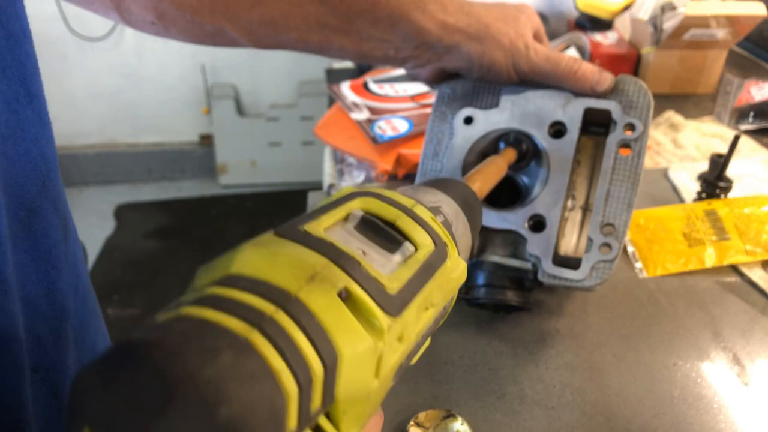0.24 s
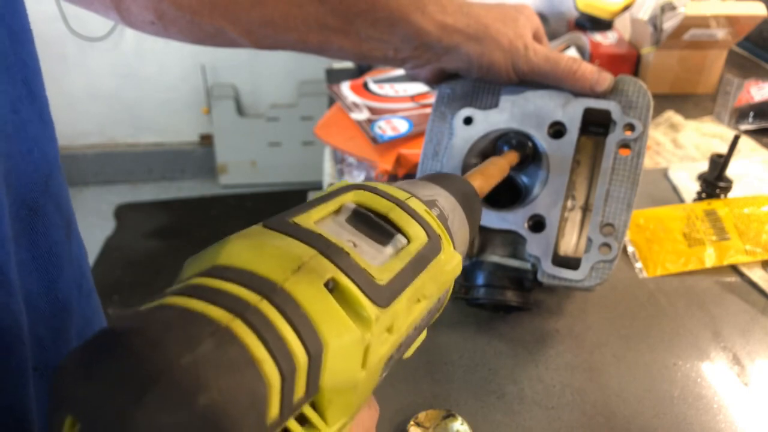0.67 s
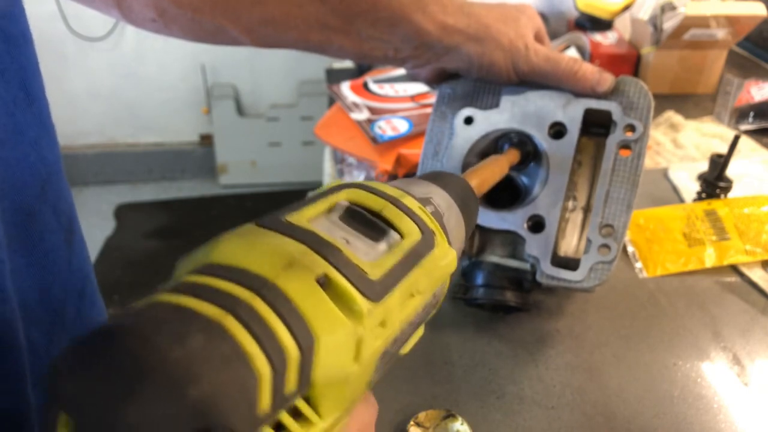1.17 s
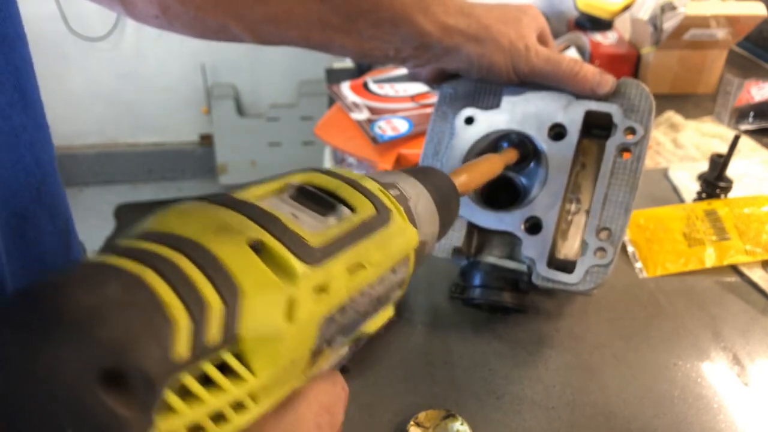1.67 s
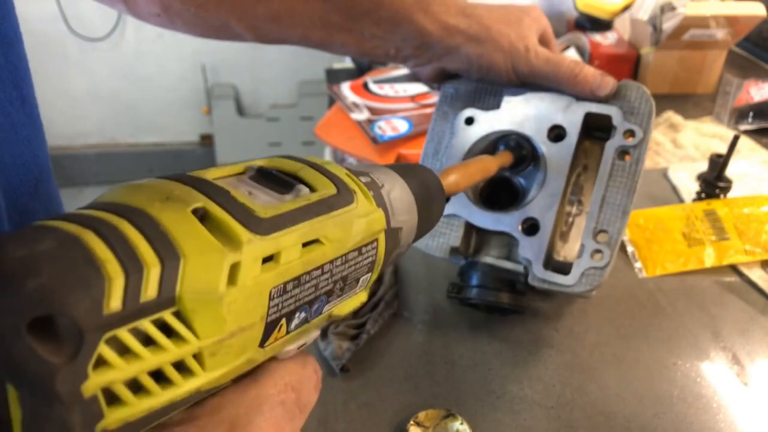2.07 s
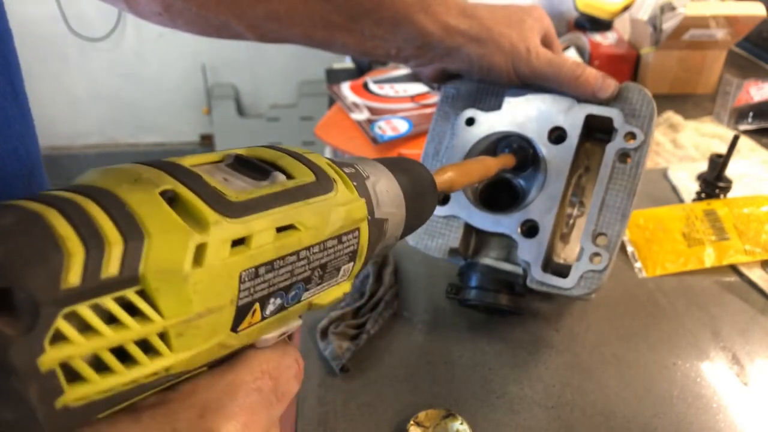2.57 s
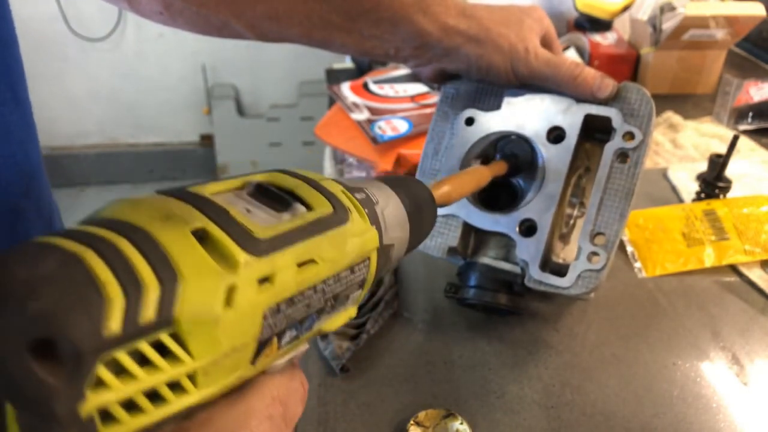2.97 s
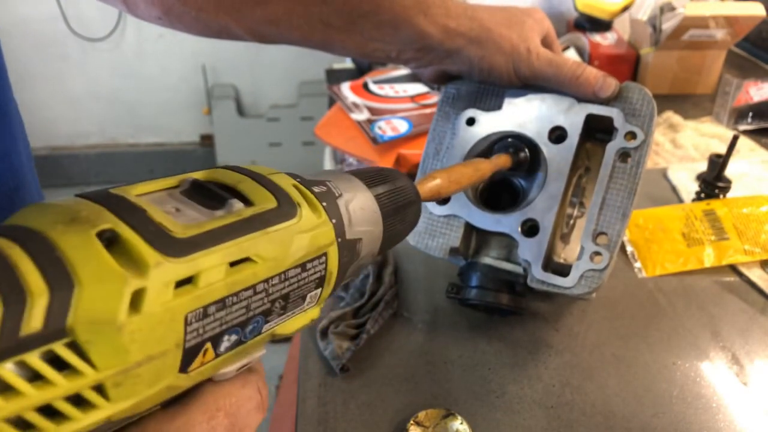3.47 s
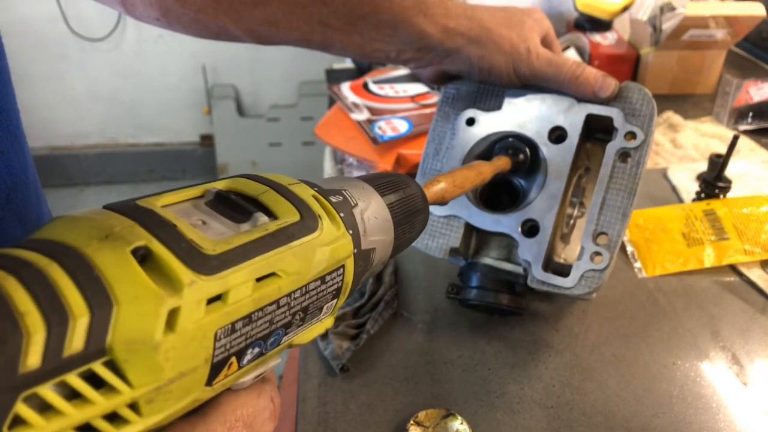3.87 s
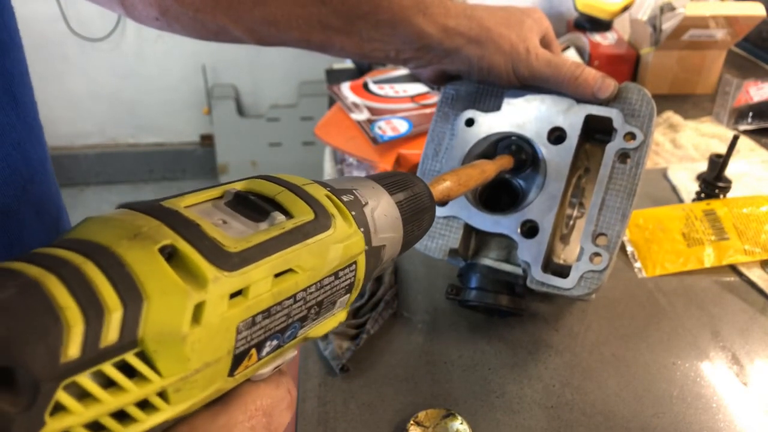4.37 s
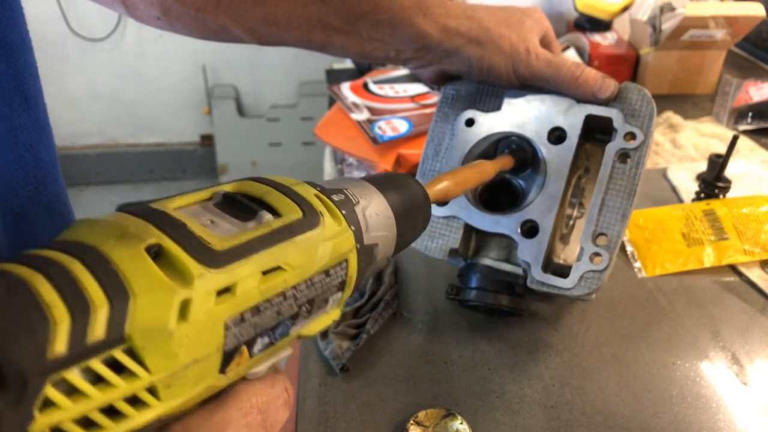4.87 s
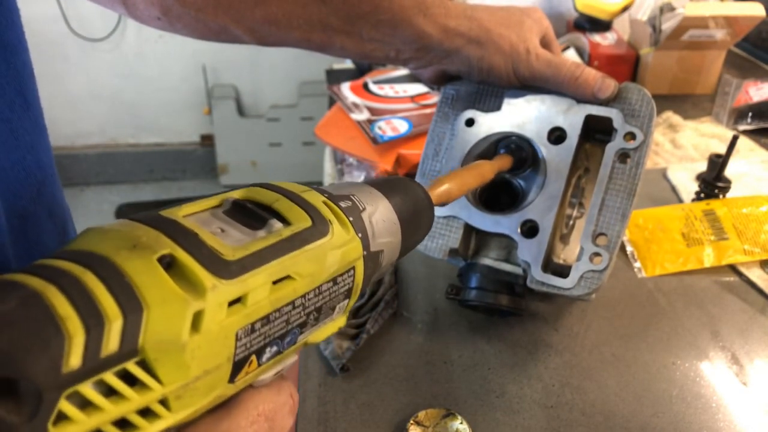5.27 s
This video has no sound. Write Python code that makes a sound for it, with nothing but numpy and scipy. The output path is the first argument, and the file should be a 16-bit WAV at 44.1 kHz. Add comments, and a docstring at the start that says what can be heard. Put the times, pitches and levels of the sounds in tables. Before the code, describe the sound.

A cordless drill is already running close to the microphone in a small workshop, its rattly gear whirr carrying a thin, very high electronic whine and, briefly, a low drone. A light touch and knock at 0.1 s lead to gritty grinding pushes at about 0.25-0.7, 0.97-1.3, 1.55-1.85, 2.15-2.5 and 2.7-3.0 s, each biting hard then mostly easing, rough and crunchy with mid-pitched metal ringing. Dull thuds mark several landings, brief bright fizzes come near 0.97 and 1.56 s, and caught grains tick. A weak last rub fades as the motor winds down around 3.2-3.3 s. Faint, falling, fuzzy squeaks follow to 3.9 s, then soft low bumps and one faint squeak around 4-4.5 s over a quiet murmur of air. At 4.6 s the drill restarts slower and quieter, the valve chattering and singing on a wavering, fluttering mid tone with small clicks, until the end near 5.6 s.

```python
"""A cordless drill spins an engine valve on its seat in gritty lapping paste, close by in a small workshop.
Random impacts of gears and brushes excite the housing as a whirr; the speed controller whines with motor sidebands.
Each push crushes clumps of grit, which ring the valve and cylinder head, with knocks, scrapes and catching grains.
The drill stops with a few faint squeaks (sliding resonant noise) and soft bumps of the hands, then runs again
more slowly, the valve chattering on one wavering mode. A short room tail and a murmur of air surround it."""
import sys
import numpy as np
from scipy import signal
from scipy.fft import rfft, irfft
from scipy.io import wavfile
from scipy.ndimage import uniform_filter1d, map_coordinates

SR = 44100
rng = np.random.default_rng(int(sys.argv[2]) if len(sys.argv) > 2 else 0)


def master_out(mix):
    """Clip the mix to full scale and print it as 16-bit PCM to the path in sys.argv[1]."""
    frames = np.transpose(np.atleast_2d(mix))
    ceiling = np.clip(frames, -1, 1)
    pcm = np.round(ceiling * 32767).astype(np.int16)
    wavfile.write(sys.argv[1], SR, pcm)


N = 243873
T = np.arange(N) / SR  # time axis [s]
HZ = np.fft.rfftfreq(8192, 1 / SR)  # frequency axis of the body responses [Hz]

# broad colour of crushed grit: (frequency [Hz], gain [dB])
GRIT_COLOUR = [(30, -50), (65, -15.5), (180, -22.5), (330, -9), (700, -8.5), (1000, -4.5), (1200, -2),
               (1450, 0), (1650, -11.5), (2000, -11.5), (3000, -20), (4000, -23.5), (7000, -35.5),
               (15000, -36)]
# resonances and dips of the valve and cylinder head: (frequency [Hz], width [Hz], lift [dB])
HEAD_MODES = [(407, 62, 6.5), (480, 40, -3.5), (538, 37, 4.5), (571, 30, -4.5), (640, 43, 4.5),
              (740, 60, -7), (1040, 31, -11), (1131, 43, 6.5), (1262, 70, 5.5), (1440, 60, 4),
              (1544, 50, -5.5), (1750, 150, -2.5), (1850, 71, 2), (1990, 28, 5), (2056, 26, 4),
              (2520, 75, 4.5), (3597, 60, 6), (3870, 64, 15), (3900, 240, 6), (4470, 49, 3), (5090, 55, 16)]


def amp(db):
    """Level law: decibels to amplitude gain."""
    return 10 ** (np.asarray(db) / 20)


def evened(x):
    """Power normalisation: scales to rms 1."""
    return x / np.sqrt(np.mean(x ** 2) + 1e-20)


def band(x, lo_hz, hi_hz):
    """Ideal band-pass: keeps the spectrum between two frequencies."""
    hz = np.fft.rfftfreq(len(x), 1 / SR)
    return irfft(rfft(x) * (hz >= lo_hz) * (hz <= hi_hz), len(x))


def wander(rate_hz):
    """Random modulation: noise from 0.5 Hz up to a rate, of rms 1."""
    return evened(band(rng.standard_normal(N), .5, rate_hz))


def curve(rows, column=1):
    """Linear interpolation: follows one column of a table through time."""
    rows = np.asarray(rows)
    return np.interp(T, rows[:, 0], rows[:, column])


def since(s):
    """Elapsed time: seconds gone by since a moment, zero before it."""
    return np.maximum(T - s, 0)


def envelope(start, end, attack_s, release_s):
    """Amplitude envelope: a straight attack, a hold and an exponential release."""
    attack = np.minimum(since(start) / attack_s, 1)
    return attack * np.exp(-since(end) / release_s)


def body(colour, resonances=()):
    """Minimum-phase response: a broad colour with resonances on it becomes a causal impulse response."""
    hz, db = np.transpose(colour)
    gain_db = np.interp(np.log(HZ + 1), np.log(hz + 1), db)
    for centre, width, lift in resonances:
        gain_db = gain_db + lift / (1 + (2 * (HZ - centre) / width) ** 2)
    log_gain = np.log(amp(np.r_[gain_db, gain_db[-2:0:-1]]))
    # the Hilbert transform of the log gain gives the phase
    spectrum = np.exp(np.conj(signal.hilbert(log_gain)))
    return np.fft.ifft(spectrum).real[:len(HZ)]


def ring(x, response):
    """Linear vibration: convolves an excitation with an impulse response."""
    return signal.oaconvolve(x, response)[:N]


def resonate(x, hz, width):
    """Damped resonance of peak gain 1, at a fixed or moving frequency."""
    turn = np.exp(2j * np.pi * np.cumsum(hz * np.ones(len(x))) / SR)
    r = np.exp(-np.pi * width / SR)
    # shift down to 0 Hz, smooth, and shift back up
    return 2 * (turn * signal.lfilter([1 - r], [1, -r], x / turn)).real


def grains(per_s, spread_db):
    """Random impulse process: tiny impacts, a few much larger than the rest, of rms 1."""
    size = amp(spread_db * np.minimum(rng.exponential(1, N), 4))
    sign = rng.choice([-1, 1], N)
    return evened(size * sign * (rng.random(N) < per_s / SR))


def add(mix, s, sound):
    """Superposition: adds a sound at a time."""
    part = mix[max(round(s * SR), 0):][:len(sound)]
    part += sound[:len(part)]


def speed(run):
    """Motor inertia: speed nears its full value exponentially after the trigger and falls evenly on release."""
    start_lag_s, spin_up_s, coast_s = .027, .02, .088
    pulled, released = run[:2]
    spin_up = 1 - np.exp(-since(pulled + start_lag_s) / spin_up_s)
    return spin_up * np.maximum(1 - since(released) / coast_s, 0)


def pressure():
    """Contact force: how hard the valve is pressed on its seat, as a gain of the grinding."""
    # each push bites, eases off and lets go:
    # (start [s], length [s], attack [s], grinding before trim [dB], easing [dB])
    push_rows = [(.08, .06, .04, -50, 0), (.256, .43, .022, -38.8, 2.8), (.966, .31, .014, -37, 5),
                 (1.545, .31, .025, -36.2, 8.5), (2.146, .38, .014, -36, 6.8), (2.692, .29, .025, -39, 4.8),
                 (3, .245, .06, -47.5, 0)]
    total = 0
    for s, length, attack, db, easing_db in push_rows:
        eased_db = db - easing_db * np.minimum(since(s) / length, 1)
        total = total + envelope(s, s + length, attack, release_s=.028) * amp(eased_db)
    return total


def gears(run, housing, motor_hz, throb):
    """Impact excitation: teeth and brushes rattle the housing, harder once a motor turn; load adds level."""
    settle_s, load_db = .45, 1.1
    pulled, _, db, start_db = run
    turns = np.cumsum(motor_hz * (1 + .02 * wander(6))) / SR
    rattle = grains(16000, 1.76) * (1 + throb * np.cos(2 * np.pi * turns)) * amp(0.84 * wander(40))
    whirr = ring(rattle, housing)
    load = pressure()
    extra_db = start_db * np.exp(-since(pulled) / settle_s) + load_db * load / load.max()
    loudness = speed(run) * amp(db + extra_db)
    return loudness * whirr / np.std(band(whirr, 1550, 16000))


def bench_echo(x, delay_s=0.001096, echo_db=-12):
    """Comb interference: the bench reflects the treble over a path that shifts as the hand sways."""
    sway = uniform_filter1d(wander(1.5), 2001)
    delay = delay_s * (1 + 0.061 * sway)
    treble = band(x, 4900, SR / 2)
    return x + amp(echo_db) * map_coordinates(treble, [(T - delay) * SR], order=3)


def whine(run, levels, motor_hz, side_db, octave_side_db, tone_db, octave_db):
    """Amplitude modulation: the turning motor puts sidebands on the switching tone and its octave."""
    switch_hz, fade_s = 7388, .012
    idle_rise_hz, current_rise_s = 650, .022  # it starts high, until the current has built up
    inrush_dip_hz, inrush_s = 400, .06  # it dips as the motor draws its starting current
    pulled, released = run[:2]
    hz = switch_hz + idle_rise_hz * np.exp(-since(pulled) / current_rise_s)
    hz = hz - inrush_dip_hz * np.exp(-since(pulled) / inrush_s)
    phase = 2 * np.pi * np.cumsum(hz + 4 * wander(60) + 6 * wander(4)) / SR
    motor = np.cos(2 * np.pi * np.cumsum(motor_hz * (1 + .015 * wander(3))) / SR)
    tone = amp(tone_db + curve(levels)) * np.sin(phase) * (1 + 2 * amp(side_db) * motor)
    octave = amp(octave_db + curve(levels, 2)) * np.sin(2 * phase)
    octave = octave * (1 + 2 * amp(octave_side_db) * motor)
    switched_on = envelope(pulled, released - 2 * fade_s, fade_s, fade_s)
    return np.sqrt(2) * switched_on * amp(0.48 * wander(50)) * (tone + octave)


def drone():
    """Resonant build-up: the gears' rattle excites a low mode of the housing, then fades early on."""
    # the droning mode: (hold until [s], frequency [Hz], width [Hz], level [dB])
    until, hz, width_hz, db = (.28, 345, 60, -48.5)
    hum = resonate(resonate(grains(16000, 1.76), hz, width_hz), hz, 3 * width_hz)
    return amp(db) * envelope(0, until, .005, .08) * evened(hum)


def workshop(x, t60=0.24, wet_db=-16):
    """Reverberant decay: a short, dull tail from nearby walls, over a murmur of air."""
    # colour of the room's air: (frequency [Hz], gain [dB])
    air_colour = [(18, -51), (30, -60), (59, -5), (129, -9), (205, -7), (384, -7), (567, -13.5), (928, -17),
                  (1270, -19.5), (1520, -23), (2990, -25.5), (3410, -21), (4090, -21.5), (15000, -39)]
    t = np.arange(SR // 2) / SR
    dull_noise = signal.lfilter([1], [1, -.6], rng.standard_normal(len(t)))
    tail = dull_noise * amp(-60 * t / t60) * (t > .005)
    air = evened(ring(rng.standard_normal(N), body(air_colour))) * amp(-66)
    air = air + .1 * wander(9.3) * band(air, 0, 1500)  # the low murmur is restless, the hiss even
    return x + amp(wet_db) * ring(x, tail / np.linalg.norm(tail)) + air


def disperse(x, spread_s):
    """Dispersion: bending waves cross the casting at different speeds and smear each click."""
    hz = np.fft.rfftfreq(N, 1 / SR)
    knots_hz = np.arange(0, SR, 400)
    delay = np.interp(hz, knots_hz, spread_s * rng.random(len(knots_hz)))
    # phase is the running sum of delay over frequency
    return irfft(rfft(x) * np.exp(-2j * np.pi * np.cumsum(delay) * SR / N), N)


def grinding():
    """Abrasive excitation: grit crushed in rapid clumps under each push rings the valve and the head."""
    trim_db = -2.07
    clumps = evened(band(rng.standard_normal(N), 70, 260))
    crush = grains(9000, 1.7) * amp(2.6 * np.clip(clumps, -2, 2))
    sound = ring(disperse(crush, spread_s=0.002022), body(GRIT_COLOUR, HEAD_MODES))
    return amp(trim_db) * pressure() * sound / np.std(band(sound, 1210, 1660))


def knocks(lag_s=0.02, bend_hz=190):
    """Dispersive impact: the valve lands and the thud bends through the bench, where bass arrives last."""
    # landings of the valve: (time [s], peak [dB])
    landings = [(0.1, -33.5), (0.3019, -24.5), (.31, -28.5), (0.9787, -29.5), (1.559, -35), (1.607, -38.5),
                (2.909, -32.5)]
    # broad colour of the thud: (frequency [Hz], gain [dB])
    thud_colour = [(30, -39), (70, -10), (130, -1.5), (220, -4.5), (320, 2), (560, 2.5), (800, -13),
                   (1500, -30), (4000, -71), (15000, -68)]
    out, t = np.zeros(N), np.arange(len(HZ)) / SR
    delay = lag_s / (1 + (HZ / bend_hz) ** 4)
    spectrum = rfft(body(thud_colour, [(280, 55, 6.5), (395, 50, 3)]), 2 * (len(HZ) - 1))
    thud = irfft(spectrum * np.exp(-2j * np.pi * np.cumsum(delay) * HZ[1]))
    for s, db in landings:
        blow = signal.unit_impulse(len(t)) + .03 * rng.standard_normal(len(t)) * np.exp(-t / 0.016)
        sound = signal.fftconvolve(blow, thud)
        add(out, s, amp(db) * sound / abs(sound).max())
    return out


def scrapes(attack_s=.004, release_s=.006):
    """Friction noise: fine grit fizzes in a high band for an instant as the valve bites."""
    # bright scrapes as a push takes hold: (time [s], length [s], level [dB])
    scrape_rows = [(.972, .05, -59), (1.56, 0.025, -53.5)]
    fizz = evened(band(grains(6000, 3.0), 7800, 11200))
    bursts = sum(amp(db) * envelope(s, s + length, attack_s, release_s) for s, length, db in scrape_rows)
    return fizz * bursts


def catches(t60=0.025, crunch_db=-11, trim_db=-1.5):
    """Damped free vibration: a coarse grain catches and breaks, a short ring of the valve with a crunch."""
    # coarse grit caught between valve and seat: (time [s], ring before trim [dB], ring frequency [Hz])
    caught_grains = [(0.9916, -26, 1250), (1.1657, -29, 1280), (1.6272, -27, 1370), (2.1605, -22, 1220),
                     (2.2847, -26, 1280), (2.4658, -29, 1240), (2.7916, -27, 1270), (2.8155, -25, 1240),
                     (4.4323, -51, 1270), (4.5531, -62, 1280), (4.6823, -30, 1260), (4.7374, -31, 1210),
                     (4.9102, -31, 1290), (5.4241, -32, 1220)]
    out, t = np.zeros(N), np.arange(len(HZ)) / SR
    head = body(GRIT_COLOUR, HEAD_MODES)
    for s, db, hz in caught_grains:
        tone = np.sin(2 * np.pi * hz * t) * amp(-60 * t / t60) * (1 - np.exp(-t / 0.00094))
        burst = rng.standard_normal(len(t)) * np.exp(-t / .003)
        crunch = signal.fftconvolve(burst, head)[:len(t)]
        sound = tone / abs(tone).max() + amp(crunch_db) * crunch / abs(crunch).max()
        add(out, s, amp(db + trim_db) * sound)
    return out


def rubbing(run, start, db):
    """Frictional excitation: the valve rattles and sings on one mode, swelling as seat high spots pass."""
    # pitch of the valve's ring: (time [s], frequency [Hz])
    ring_pitch = [(4.62, 1243), (4.68, 1262), (4.74, 1213), (4.94, 1268), (5.06, 1212), (5.18, 1240),
                  (5.38, 1202), (5.46, 1228), (5.53, 1290)]
    singing = .75  # share of the power in the steady tone
    throb, flutter_db, jitter_hz, passes_hz = .3, 1.6, 11, 20.5
    mode_hz = curve(ring_pitch) + 3 * wander(14)
    passes = np.cumsum(passes_hz * (1 + 0.12 * wander(5))) / SR
    rattle = evened(resonate(resonate(grains(2500, 2.1), mode_hz, 105), mode_hz, 440))
    phase = 2 * np.pi * np.cumsum(mode_hz + jitter_hz * wander(97)) / SR
    tone = evened(np.sin(phase) * amp(flutter_db * wander(120)))
    swell = 1 + throb * np.cos(2 * np.pi * passes)
    contact = speed(run) * np.minimum(since(start) / .02, 1)
    return amp(db) * contact * swell * (np.sqrt(1 - singing) * rattle + np.sqrt(singing) * tone)


def squeaks(width_hz=330):
    """Gliding resonance: noise in a narrow, falling band makes short, fuzzy squeaks."""
    # squeaks while the drill is at rest: (time [s], length [s], start frequency [Hz], level [dB])
    squeak_rows = [(3.32, .067, 4750, -63), (3.348, .058, 3850, -57.5), (3.385, .055, 3950, -57.5),
                   (3.41, .085, 3550, -66), (3.52, .12, 4450, -73), (3.63, .16, 3850, -70),
                   (3.73, .12, 4500, -73.5), (4.198, .14, 3600, -73)]
    fall = .09  # share of its pitch that each squeak slides down
    out = np.zeros(N)
    for s, length, start_hz, db in squeak_rows:
        hz = start_hz * np.linspace(1, 1 - fall, round(length * SR))
        noise = rng.standard_normal(N)[:len(hz)]
        slip = resonate(resonate(noise, hz, width_hz), hz, 3 * width_hz)
        add(out, s, amp(db) * evened(slip) * np.sin(np.linspace(0, np.pi, len(hz))))
    return out


def bumps(hz=328, width_hz=70):
    """Low-mode excitation: hands shift their grip and softly stir a low resonance of the housing."""
    # shifts of the hands on drill and head: (time [s], length [s], level [dB])
    bump_rows = [(3.99, .14, -72), (4.109, .089, -60.5), (4.419, .06, -66)]
    out = np.zeros(N)
    for s, length, db in bump_rows:
        hum = resonate(resonate(rng.standard_normal(N), hz, width_hz), hz, 3 * width_hz)
        hum = hum[-round(length * SR):]  # the settled end
        add(out, s, amp(db) * evened(hum) * np.sin(np.linspace(0, np.pi, len(hum))))
    return out


def scene():
    """Superposition of drill, valve and room, alike in both channels."""
    # the two runs: (trigger pulled [s], trigger released [s], whirr above 1550 Hz [dB], extra at start [dB])
    fast_run = (-0.08, 3.223, -48.3, 5.8)
    slow_run = (4.562, 5.6, -49.8, -1.5)
    # broad colours of the gear noise: (frequency [Hz], gain [dB])
    fast_colour = [(21, -65), (35, -9), (229, -13), (326, -2.5), (663, -8), (1250, -1.5), (1650, -11),
                   (1880, -8), (3280, -9.5), (3630, -8.5), (6830, -17.5), (7370, -17.5), (8370, -21),
                   (13900, -25), (15000, -29.5)]
    slow_colour = [(21, -73), (35, -40), (97, -31), (253, -28), (399, -13), (465, -23.5), (646, -23.5),
                   (995, -13), (1220, -8), (1610, -22), (2540, -21), (7010, -33.5), (7560, -35),
                   (9750, -41.5), (15000, -42)]
    # resonances and dips of the housing, then of housing and valve stem under light load;
    # the last row of each is the recorder's treble roll-off: (frequency [Hz], width [Hz], lift [dB])
    whirr_shape = [(325, 82, 5.5), (493, 47, -4.5), (520, 40, 5), (650, 240, 1), (830, 53, 6.5),
                   (918, 50, 4), (1100, 60, 2.5), (1257, 60, 8.5), (1430, 117, -3), (1720, 130, -5),
                   (1790, 110, 5), (2145, 60, 1.5), (2260, 80, -5.5), (2540, 450, 4), (3614, 111, 5),
                   (4500, 400, -0.5), (5120, 200, 5.5), (5800, 180, 4.5), (6080, 200, -3), (7700, 750, 4.5),
                   (10680, 700, 3), (12700, 400, 5.5), (15500, 900, -9)]
    light_whirr_shape = [(325, 63, 5), (409, 40, 3), (547, 62, 10), (642, 130, -5), (824, 80, 5.5),
                         (1400, 45, 1), (1844, 55, 7.5), (2010, 38, 6), (2240, 100, -3.5), (2380, 60, 2.5),
                         (2570, 140, 5), (3300, 83, -9), (3520, 120, 5), (3910, 51, 12.5), (4200, 70, 4),
                         (4550, 440, -2), (5030, 80, 7), (5180, 90, 10.5), (5880, 140, 8.5),
                         (7500, 400, 1.5), (8700, 400, 2), (11100, 700, 5), (12400, 500, 3),
                         (15500, 1000, -9)]
    # whine in each run, before its trims: (time [s], switching tone [dB], octave [dB])
    fast_whine = [(0.0, -58, -69), (0.04, -63, -68), (0.28, -61, -67), (0.35, -67, -67), (0.63, -62, -65),
                  (0.71, -54, -69), (0.79, -65, -69), (0.86, -55, -66), (1.03, -53, -65), (1.18, -62, -67),
                  (1.28, -55, -71), (1.33, -54, -62), (1.48, -54, -71), (1.75, -58, -73), (1.98, -58, -65),
                  (2.12, -59, -71), (2.21, -55, -64), (2.34, -57, -66), (2.38, -65, -67), (2.47, -64, -63),
                  (2.66, -54, -73), (2.99, -61, -68), (3.11, -59, -62), (3.2, -61, -65)]
    slow_whine = [(4.6, -72, -78), (4.644, -69, -71), (5.148, -69, -75), (5.242, -68, -69),
                  (5.392, -66, -77), (5.53, -68, -73)]
    fast_motor_hz, slow_motor_hz = 255, 182

    whirr = gears(fast_run, body(fast_colour, whirr_shape), fast_motor_hz, throb=0.12)
    whirr += gears(slow_run, body(slow_colour, light_whirr_shape), slow_motor_hz, throb=0.12)
    drill = bench_echo(band(whirr, 51, SR / 2)) + drone()
    drill += whine(fast_run, fast_whine, fast_motor_hz, side_db=-27, octave_side_db=-12,
                   tone_db=4.1, octave_db=2.7)
    drill += whine(slow_run, slow_whine, slow_motor_hz, side_db=-17, octave_side_db=-5,
                   tone_db=3, octave_db=1.5)
    valve = grinding() + knocks() + scrapes() + catches()
    # the valve rests lightly on its seat until the drill stops
    valve += rubbing(fast_run, start=2.95, db=-48.5)
    valve += rubbing(slow_run, start=4.6, db=-44.2)
    mono = workshop(drill + valve + squeaks() + bumps())
    return np.array([mono, mono])


def record(dry):
    """Linear filtering: the microphone's bass roll-off, then the recorder's band limit."""
    thinned = signal.sosfilt(signal.butter(2, 50, "highpass", fs=SR, output="sos"), dry)
    band_limit = signal.firwin(511, 15700, window=("kaiser", 9), fs=SR)
    return signal.oaconvolve(thinned, band_limit[None], "same")


dry = scene()
out = record(dry)
master_out(out)
```